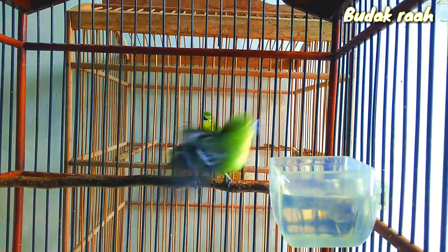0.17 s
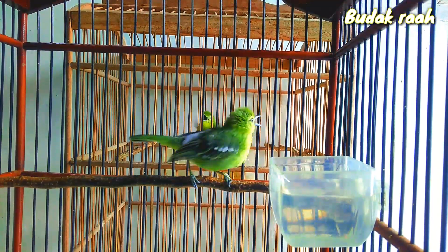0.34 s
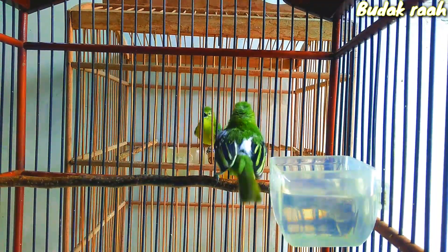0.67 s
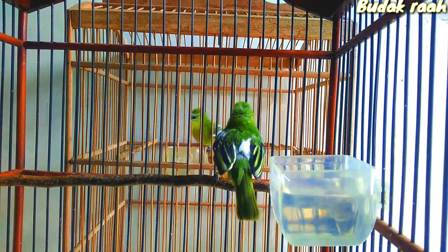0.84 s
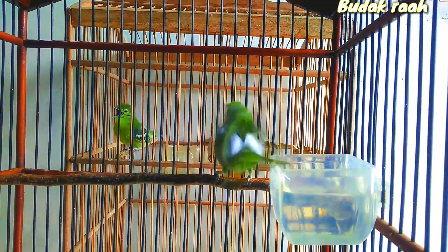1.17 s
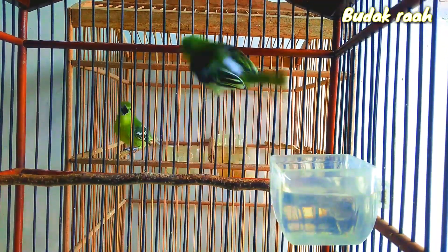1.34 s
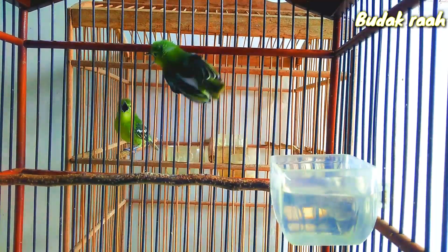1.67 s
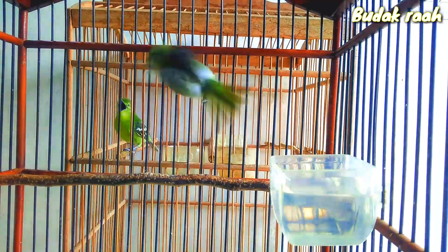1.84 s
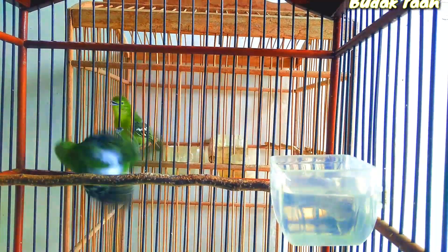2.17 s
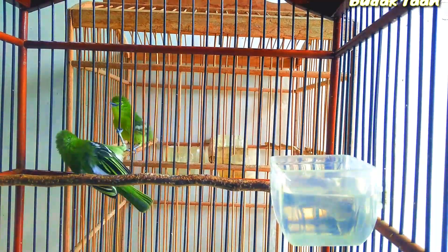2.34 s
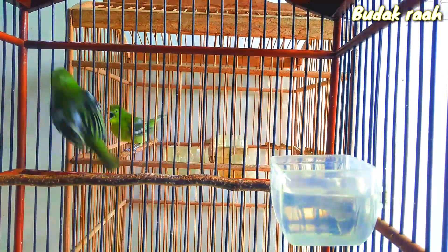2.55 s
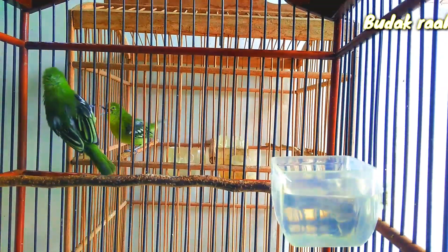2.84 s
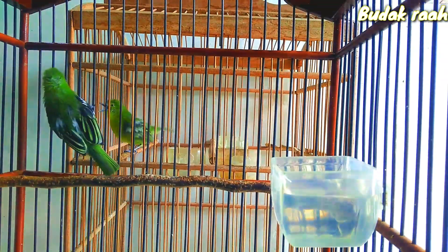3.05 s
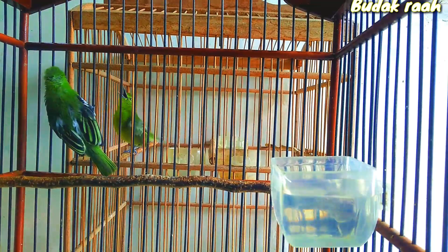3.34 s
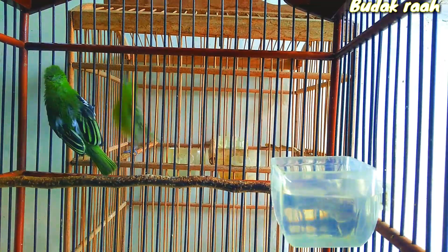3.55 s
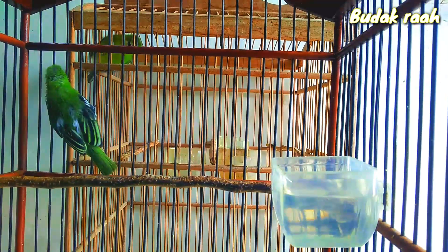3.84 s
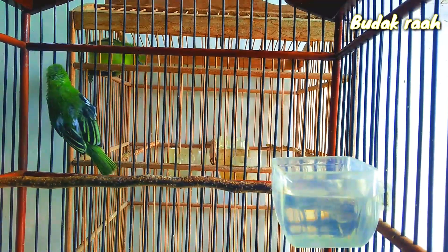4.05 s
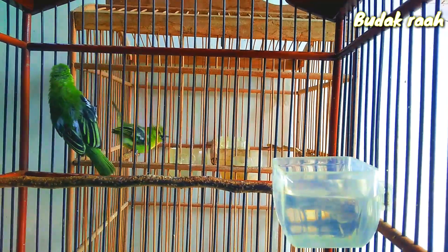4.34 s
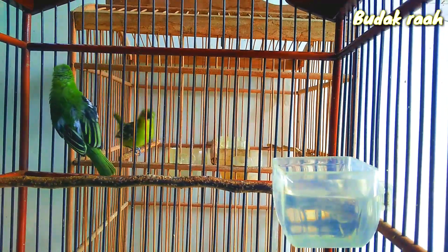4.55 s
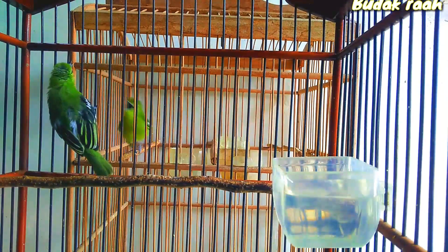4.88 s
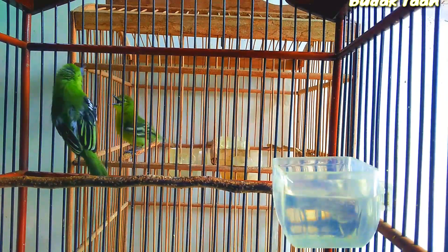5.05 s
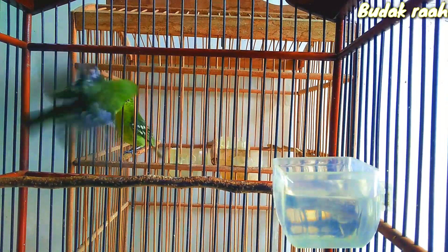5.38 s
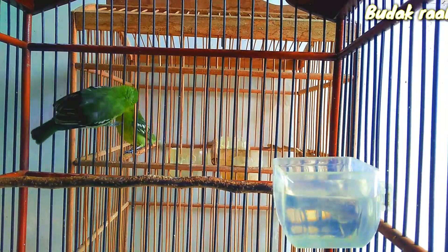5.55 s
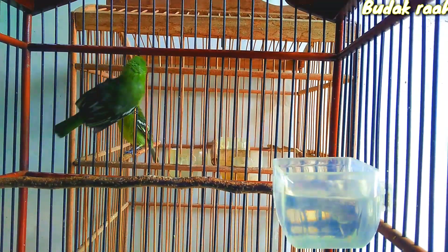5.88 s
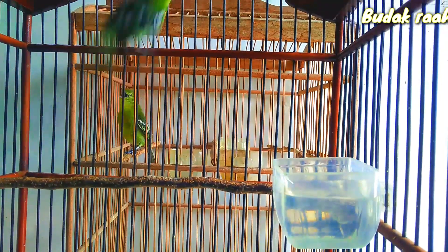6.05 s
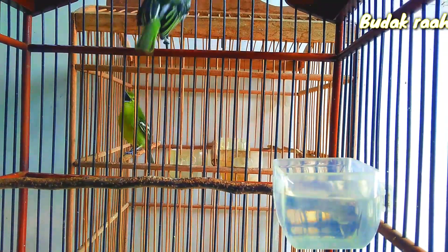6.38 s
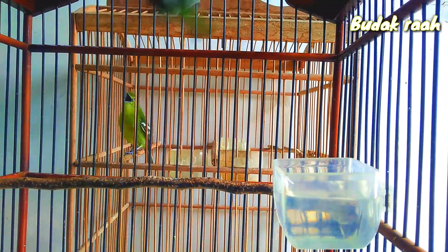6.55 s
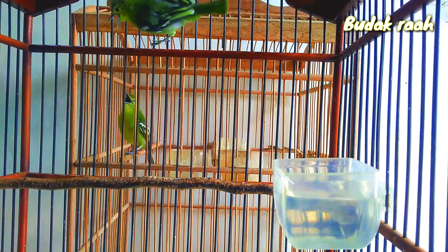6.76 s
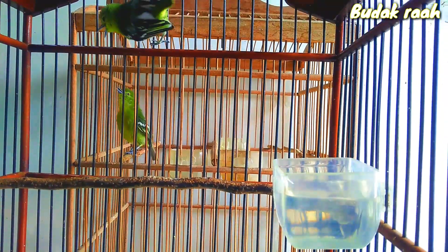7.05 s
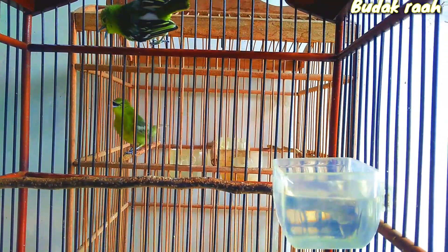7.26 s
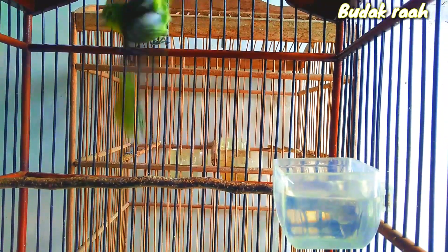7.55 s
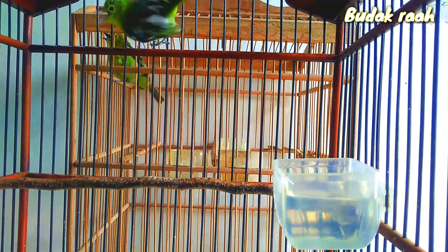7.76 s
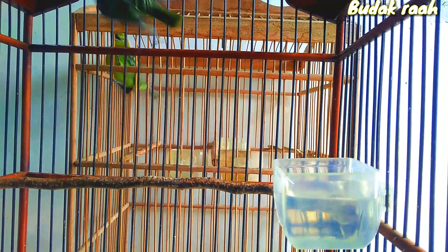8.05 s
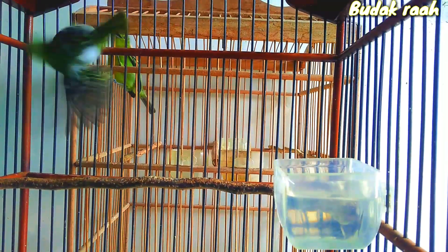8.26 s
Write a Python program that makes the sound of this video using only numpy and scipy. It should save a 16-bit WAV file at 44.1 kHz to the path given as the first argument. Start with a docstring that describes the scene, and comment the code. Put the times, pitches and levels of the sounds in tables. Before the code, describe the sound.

Two small birds call close by in wooden cages. A long harsh rasp swells and ends in a falling whistle. A fast high trill follows, mixed with short rough scolds and thin chirps, and ends in a louder falling whistle. A second long rasp and whistle come next, then a brief trill. Feet and wings knock and brush the bars. Nearby walls add a short echo, and distant motors hum faintly.

```python
"""Two small caged birds, close by: long rasps and a fast trill, each ending in a loud falling whistle.
A rasp is a harmonic tone warbled about 120 times a second; a trill is a train of gliding pips.
Short rough scolds and thin chirps fall between. Feet and wings knock and brush the wooden cages.
Nearby walls echo; distant motors hum in street noise. The loudest peaks overload the microphone."""
import sys
import numpy as np
from scipy import signal
from scipy.fft import rfft, irfft, next_fast_len
from scipy.io import wavfile
from scipy.ndimage import uniform_filter1d

SR = 44100
rng = np.random.default_rng(int(sys.argv[2]) if len(sys.argv) > 2 else 0)


def to_wav(sig):
    """Store sig (one row per channel, or 1-D mono) as 16-bit WAV at the path in sys.argv[1].

    Samples outside -1..1 are clipped; the rate is SR.
    """
    pcm = np.clip(np.atleast_2d(sig), -1, 1) * 32767
    pcm = np.round(pcm).astype(np.int16)
    wavfile.write(sys.argv[1], SR, pcm.T)  # frames by channels


N = 371322
TIME_S = np.arange(N) / SR

# per motor: (time [s], shaft rate [Hz], level [dB])
MOTOR_RUNS = [
    [(0.6, 23, -79.5), (1.3, 23, -46.5), (2.2, 17.5, -59.5), (3.1, 15, -56.5), (4.0, 29.3, -56.5),
     (5.1, 29.4, -57), (5.7, 29.3, -59), (6.6, 27, -64)],
    [(5.9, 27.5, -73), (6.8, 27.2, -61), (7.3, 26.9, -54.5), (7.95, 26.7, -49.5), (8.25, 29, -60)],
]
# per motor: (shaft order, level [dB])
MOTOR_ORDERS = [
    [(2, 4), (3, -21), (4, -1), (5, 1.5), (6, -8.5), (8, -7.5)],
    [(3, 1), (4, 5), (5, 1.5), (6, -5), (7, -3), (8, 3), (9, -1), (10, -7.5), (11, -9.5)],
]
# motor bass cut: (frequency [Hz], gain [dB])
EXHAUST_EQ = [(35, -28.5), (57, 2.5)]
# street noise colour: (frequency [Hz], gain [dB])
STREET_EQ = [(25, -26), (60, -0.5), (100, -3.5), (170, -11), (330, -9.5), (650, -16), (1300, -20.5),
             (4300, -31), (9900, -24), (15000, -45.5)]
# street noise: (time [s], level [dB])
STREET_LEVEL = [(0, -68), (2.8, -68.5), (3.5, -60), (5, -52.5), (5.5, -59), (6.5, -53), (7.9, -48),
                (8.42, -55.5)]
# hollow swells: (time [s], half length [s], centre [Hz], level [dB])
HOLLOW_SWELLS = [(1.12, 0.056, 480, -64.5), (2.188, 0.042, 506.6, -55.5), (2.68, 0.05, 487, -61),
                 (3.13, 0.033, 644, -59), (3.48, 0.081, 1025, -58), (3.679, 0.048, 363, -56.5),
                 (4.15, 0.093, 771, -67), (7.295, 1, 635, -60.5), (7.813, 0.24, 221, -52),
                 (7.88, 0.11, 1070, -64.5), (7.854, 0.07, 1803, -59)]
# air on the microphone: (time [s], half length [s], level [dB])
AIR_PUFFS = [(0.836, 0.043, -45), (1.314, 0.069, -37), (1.721, 0.15, -42.5), (2.381, 0.088, -49.5),
             (4.91, 0.075, -51.5), (6.825, 0.12, -41)]
# cage and wall echoes: (left delay [s], right delay [s], gain [dB])
ECHOES = [(.0023, 0.0063, -26.5), (.0068, .0054, -10.5), (0.0128, .0102, -8.5), (.019, 0.025, -16.5),
          (.036, .033, -16.5), (0.051, 0.057, -22.5)]
# diffuse tail: (frequency [Hz], T60 [s])
ROOM_T60 = [(200, 0.079), (1600, 0.28), (2400, 0.29), (4000, 0.18), (8000, 0.4), (14000, 0.11)]
# wing swishes: (time [s], half length [s], level [dB])
SWISHES = [(2.666, 0.054, -50), (4.343, 0.042, -46.5), (5.363, 0.048, -58), (5.798, 0.04, -48),
           (5.89, 0.024, -41), (6.222, 0.036, -39.5), (6.769, 0.017, -28)]
# hits on bars and perch: (time [s], tick [dB], thud [dB], tick decay [s])
KNOCKS = [(0.063, -45.5, -63, 0.0034), (0.542, -49, -59, 0.005), (2.202, -20, -34.5, 0.0021),
          (2.206, -44, -52.5, 0.035), (2.536, -46, -83, 0.0046), (2.563, -49, -84, 0.0026),
          (2.642, -37, -59.5, 0.007), (4.446, -43.5, -56.5, 0.012), (5.362, -54, -79, 0.003),
          (5.412, -49, -65, 0.011), (6.143, -38.5, -56, 0.015), (6.54, -30.5, -65, 0.027),
          (6.624, -29, -44, 0.011)]
# claw or feather on a bar: (frequency [Hz], gain [dB])
BAR_EQ = [(500, -40), (2000, -4), (4500, -9.5), (6500, -2.5), (11000, 12.5), (15000, -18)]
# wooden frame: (frequency [Hz], gain [dB])
WOOD_EQ = [(100, -9), (250, -10), (500, 1.5), (900, -2.5), (1600, -22), (4000, -36)]
# farther bird: (start [s], length [s], first pitch [Hz], last pitch [Hz], level [dB], jitter [ratio])
CHIRPS = [(3.265, 0.026, 4440, 6920, -34, 0.042), (4.048, 0.047, 5165, 5074, -28, 0.021),
          (4.699, 0.068, 5090, 4560, -35, 0.04), (7.675, 0.14, 5270, 5670, -45.5, 0.12)]
# scolds: (peak time [s], length [s], level [dB], peak pitch [Hz], hiss re voice [dB])
SCOLDS = [(0.659, 0.062, -22.5, 1347, -26.5), (0.81, 0.059, -20, 1222, -31), (2.909, 0.02, -33, 1407, -23),
          (2.946, 0.047, -22, 1345, -17.5), (3.082, 0.044, -22.5, 1271, -28),
          (4.748, 0.034, -20, 1401, -18.5), (4.832, 0.04, -22, 1367, -13), (4.916, 0.042, -21, 1326, -15),
          (4.995, 0.053, -24.5, 1392, -13), (5.621, 0.059, -27, 1343, -13.5),
          (8.291, 0.053, -23.5, 1542, -8)]
# per trill: (time [s], pitch [Hz], level [dB], left-right [dB], wall send [dB])
TRILLS = [
    [(2.971, 3195, -28, 17, -1), (3.08, 3211, -20, 36, 3), (3.42, 3145, -14, 19.5, 3),
     (3.65, 3084, -13.5, -3.5, -2.5), (3.83, 3034, -18, -7, 8.5), (4.25, 2985, -19.5, 4.5, 2),
     (4.965, 2914, -18.5, 2, -8.5)],
    [(8.237, 3074, -27, 5, 1), (8.335, 3218, -7.5, 20, -3.5), (8.41, 3214, -19.5, 24, 7)],
]
# stressed pips: (time [s], boost [dB])
STRESSES = [(4.274, 4), (4.442, 7), (4.776, 8), (4.834, 7)]
# pip overtones: (harmonic, level [dB])
PIP_PARTIALS = [(2, -39), (3, -31.5), (4, -47), (5, -42)]
# whistles: (start [s], length [s], attack [s], first pitch [Hz], last pitch [Hz],
# bend [0 even slide, 1 hold then drop], peak [dB], croak [dB])
WHISTLES = [(2.26, 0.2, 0.081, 2294, 1683, 0.34, -9.5, -46), (4.99, 0.17, 0.021, 2477, 1471, 0.6, 0, -33.5),
            (7.079, 0.2, 0.081, 2294, 1729, 0.29, -10.5, -46.5)]
# whistle overtones: (harmonic, level [dB])
WHISTLE_PARTIALS = [(2, -1.5), (3, -2.5), (4, 2.5), (5, -2), (6, 0.5), (7, -16)]
# colour the whistle overtones slide through: (frequency [Hz], gain [dB])
WHISTLE_EQ = [(3300, -47), (4400, -48), (6000, -54), (8600, -39), (10200, -43), (12200, -26), (13400, -31),
              (15000, -44)]
# rasps: (start [s], hold [s], slack ending [s], first level [dB], top level [dB],
# mid pitch [Hz], warble depth [ratio])
RASPS = [(0.835, 1.063, 0.24, -24, -16, 1246, 0.11), (5.738, 1.178, 0.022, -28.5, -14, 1234, 0.088)]
# rasping voice: (harmonic, firm level [dB], slack level [dB])
RASP_PARTIALS = [(1, -29.5, -27), (2, -20, -20), (3, 5, -1.5), (4, -15, 5), (5, -27.5, -15)]
# rasping voice colour: (frequency [Hz], gain [dB])
BEAK_EQ = [(1000, -9), (1260, 3), (1450, -6), (1750, -1), (2050, 6), (2450, -1.5), (2850, -6), (3300, -2.5),
           (3750, -3.5), (4250, -2), (4600, -2), (4950, -7), (5500, -9.5), (6500, -12)]
# hiss in the calls: (frequency [Hz], gain [dB])
HISS_EQ = [(4500, -41.5), (5800, -6.5), (7200, -14.5), (8700, -6.5), (10900, 1.5), (13400, -6.5),
           (15200, -19)]
# hiss in the rasps: (time [s], level [dB])
RASP_HISS_LEVEL = [(0.84, -58), (1.03, -55), (1.11, -44.5), (1.28, -42.5), (1.42, -37.5), (1.75, -34.5),
                   (2.12, -30.5), (5.74, -61.5), (6.08, -52), (6.2, -44.5), (6.48, -40), (6.6, -32.5),
                   (6.76, -30), (6.94, -28.5)]
# microphone ports, right one brighter: (frequency [Hz], left-right [dB])
PORT_BALANCE = [(4500, 3), (7000, 3.5), (11000, -4)]


def amp(db):
    """Decibels to gain."""
    return 10 ** (np.asarray(db) / 20)


def unit(x):
    """Scale to rms 1."""
    return x / np.sqrt(np.mean(x ** 2) + 1e-20)


def bell(t, half_s):
    """Gaussian envelope, 1/e at +-half_s."""
    return np.exp(-(t / half_s) ** 2)


def follow(rows, t):
    """Each column of a time curve at t."""
    times, *columns = np.transpose(rows)
    return [np.interp(t, times, column) for column in columns]


def spectrum_at(points, hz):
    """Interpolate over log frequency."""
    knots_hz, values = np.transpose(points)
    return np.interp(np.log(hz + 1), np.log(knots_hz), values)


def colour(x, eq):
    """Filter by a dB curve."""
    size = next_fast_len(x.shape[-1] + 2048)
    gain = amp(spectrum_at(eq, np.fft.rfftfreq(size, 1 / SR)))
    return irfft(rfft(x, size) * gain, size)[..., :x.shape[-1]]


def drift(size, rate_hz):
    """Smooth random wander, rms about 1."""
    knots = rng.standard_normal(int(size / SR * rate_hz) + 3)
    return np.interp(np.arange(size) / SR * rate_hz, np.arange(len(knots)), knots)


def resonate(x, hz, width_hz):
    """Double-pole resonance, unity gain."""
    carrier = np.exp(2j * np.pi * np.cumsum(np.full(len(x), hz)) / SR)
    r = np.exp(-np.pi * width_hz / SR)
    return 2 * (carrier * signal.lfilter([(1 - r) ** 2], [1, -2 * r, r * r], x / carrier)).real


def band(x, hz, width_hz):
    """Flat-topped band-pass."""
    carrier = np.exp(2j * np.pi * np.cumsum(np.full(len(x), hz)) / SR)
    lowpass = signal.butter(2, width_hz / 2, fs=SR, output="sos")
    return 2 * (carrier * signal.sosfilt(lowpass, x / carrier)).real


def tone(hz, partials=((1, 0),)):
    """Harmonics of a pitch curve; default is a sine."""
    phase = 2 * np.pi * np.cumsum(hz) / SR
    return sum(amp(db) * np.sin(round(k) * phase) for k, db in partials)


def patchy(x, depth_db=3.2):
    """Swell and sink in random time-frequency patches."""
    bins = signal.stft(x, nperseg=2048)[2]
    patches = uniform_filter1d(rng.standard_normal(bins.shape[1:]), size=6, axis=0)
    patches = unit(uniform_filter1d(patches, size=7, axis=1))
    return signal.istft(bins * amp(depth_db * patches), nperseg=2048)[1][:, :N]


def add(mix, start_s, sound, pan_db, send_db):
    """Add to left, right and wall send; pan_db is left minus right."""
    part = mix[:, max(round(start_s * SR), 0):][:, :len(sound)]
    sides = amp([pan_db / 2, -pan_db / 2])
    part += np.append(sides / sides.mean(), amp(send_db))[:, None] * sound[:part.shape[1]]


def motor(run, orders):
    """Distant engine: low, slightly wavering shaft orders."""
    shaft_hz, db = follow(run, TIME_S)
    hum = unit(tone(shaft_hz * (1 + 0.0011 * drift(N, 21)), orders))
    return colour(hum, EXHAUST_EQ) * amp(db + drift(N, 5.6))


def outdoors(coherence=0.16, hollow_width_ratio=0.17, pan_db=3.0):
    """Motors, uneven street noise with hollow swells, low puffs of air."""
    motors = sum(motor(run, orders) for run, orders in zip(MOTOR_RUNS, MOTOR_ORDERS))
    common = np.sqrt(coherence) * rng.standard_normal(N)
    noise = common + np.sqrt(1 - coherence) * rng.standard_normal((2, N))
    street = unit(colour(patchy(noise), STREET_EQ))
    street *= amp(follow(STREET_LEVEL, TIME_S)[0] + drift(N, 14))
    puffs = sum(amp(db) * bell(TIME_S - at_s, half_s) for at_s, half_s, db in AIR_PUFFS)
    air = puffs * unit(resonate(rng.standard_normal(N), hz=90, width_hz=33))
    hollow = sum(amp(db) * bell(TIME_S - at_s, half_s)
                 * unit(resonate(noise[0], hz, hollow_width_ratio * hz))
                 for at_s, half_s, hz, db in HOLLOW_SWELLS)
    return (motors + street + air + hollow) * amp([[pan_db / 2], [-pan_db / 2]])


def walls(send, tail_db=-12, pan_db=3.5, build_s=0.02):
    """Distinct echoes plus a short diffuse tail."""
    hz, t, bins = signal.stft(rng.standard_normal((2, SR // 2)), SR, nperseg=256)
    bins = bins * amp(-60 * t / spectrum_at(ROOM_T60, hz)[:, None]) * (1 - np.exp(-t / build_s))
    response = signal.istft(bins, SR, nperseg=256)[1]
    response *= amp(tail_db) / np.linalg.norm(response[0])
    for left_s, right_s, db in ECHOES:
        response[[0, 1], [round(left_s * SR), round(right_s * SR)]] += amp(db)
    return signal.fftconvolve(send[None], response, axes=1)[:, :N] * amp([[pan_db / 2], [-pan_db / 2]])


def wings(grain_db=5):
    """Feathers brush the bars in grainy swishes."""
    mix = np.zeros((3, N))
    envelope = sum(amp(db) * bell(TIME_S - at_s, half_s) for at_s, half_s, db in SWISHES)
    grains = rng.standard_normal(N) * amp(grain_db * drift(N, 340))
    add(mix, 0, envelope * unit(colour(grains, BAR_EQ)), pan_db=4, send_db=8)
    return mix


def cage_knocks():
    """Claws tick and scrape on the bars; the wooden frame thuds."""
    mix = np.zeros((3, N))
    t = np.arange(0, .2, 1 / SR)
    for start_s, tick_db, thud_db, decay_s in KNOCKS:
        claw, frame = rng.standard_normal((2, len(t)))
        scrape = unit(colour(claw * amp(1.7 * drift(len(t), 590)), BAR_EQ))
        tick = 4.2 * scrape * np.exp(-t / decay_s) * (1 - np.exp(-2 * t / decay_s))
        thud = unit(colour(frame, WOOD_EQ)) * np.exp(-t / (decay_s + 0.015))
        add(mix, start_s, amp(tick_db) * tick + amp(thud_db) * thud, pan_db=13, send_db=-2)
    return mix


def chirps():
    """Thin hoarse notes with a strong octave, mostly heard off the walls."""
    mix = np.zeros((3, N))
    for start_s, length_s, first_hz, last_hz, db, jitter in CHIRPS:
        size = int(length_s * SR)
        hz = np.linspace(first_hz, last_hz, size) * (1 + jitter * drift(size, 1376))
        note = tone(hz, [(1, -5.5), (2, -7), (3, -20)]) * signal.windows.tukey(size, .6)
        add(mix, start_s, amp(db) * note, pan_db=33, send_db=13.5)
    return mix


def warble(t, pitch_hz, rate_hz, depth, jitter, slack, throb_db=2, shimmer_db=3.45):
    """Rasping voice and its hiss: fast pitch modulation, loudest at each crest."""
    cycles = np.cumsum(rate_hz * (1 + 0.009 * drift(len(t), 120))) / SR
    crest = np.cos(2 * np.pi * cycles)
    swing = depth * crest * (1 + 0.21 * drift(len(t), 240))
    hz = pitch_hz * (1 + swing + jitter * drift(len(t), 1600))
    throb = amp(throb_db * crest + shimmer_db * drift(len(t), 120))
    partials = [(k, firm_db + (slack_db - firm_db) * slack) for k, firm_db, slack_db in RASP_PARTIALS]
    voice = colour(throb * tone(hz, partials), BEAK_EQ)
    hiss = colour(throb * rng.standard_normal(len(t)), HISS_EQ)
    return unit(voice), unit(hiss)


def scolds(attack_share=0.4, pitch_arch=0.15):
    """Short bursts of the rasping voice; pitch and level arch together."""
    mix = np.zeros((3, N))
    for peak_s, length_s, db, peak_hz, hiss_db in SCOLDS:
        t = np.arange(0, length_s, 1 / SR)
        rise_s = attack_share * length_s
        swell = np.sin(np.interp(t, [0, rise_s, length_s], [0, np.pi / 2, np.pi])) ** 2
        hz = peak_hz * (1 - pitch_arch * (1 - swell))
        voice, hiss = warble(t, hz, rate_hz=131, depth=0.094, jitter=0.115, slack=0)
        burst = amp(db) * swell * (voice + amp(hiss_db) * hiss)
        add(mix, peak_s - rise_s, burst, pan_db=8.5, send_db=4.5)
    return mix


def pip_times(trill, quick_gap_s, tired_gap_s, tires_after_s=0.911, tiring_s=0.14):
    """(time [s], tiredness [0-1]) per pip; a tired bird slows."""
    start_s, end_s = trill[0][0], trill[-1][0]
    age_s = np.arange(0, end_s - start_s, quick_gap_s)
    age_s += np.maximum(age_s - tires_after_s, 0) * (tired_gap_s / quick_gap_s - 1)
    age_s = age_s[age_s < end_s - start_s]
    tired = 1 / (1 + np.exp((tires_after_s - age_s) / tiring_s))
    return zip(start_s + age_s, tired)


def pip(t, hz, db, tired, quick_half_s=0.0055, tired_half_s=0.017, dulling_db=-9):
    """Upward glide through the throat resonance; longer and duller when tired."""
    u = t / (quick_half_s + (tired_half_s - quick_half_s) * tired)
    glide = 0.012 * (1 - np.exp(-np.maximum(u, -1.6)))
    pitch_hz = hz * (1 + glide + 0.011 * drift(len(t), 503.5))
    fundamental = amp(db) * tone(pitch_hz) / np.cosh(2.1 * u)
    # overtones miss the resonance and peak earlier
    overtone_db = -12 + dulling_db * tired + 2 * rng.standard_normal()
    overtones = amp(overtone_db) * tone(pitch_hz, PIP_PARTIALS) * bell(t + 0.0083, half_s=0.0072)
    return (fundamental + overtones) * signal.windows.tukey(len(t), .3)


def trills(quick_gap_s=0.0506, tired_gap_s=0.056, scatter_db=0.3, left_lag_samples=5,
           catch_db=-45, catch_hz=3850, catch_hz_per_s=110000, lead_s=0.017, lag_s=0.0035):
    """Pip trains; a quick rising catch leads each pip, a second sounds at the peak of tired pips."""
    mix = np.zeros((3, N))
    t = np.arange(-.03, .03, 1 / SR)
    for trill in TRILLS:
        for at_s, tired in pip_times(trill, quick_gap_s, tired_gap_s):
            hz, db, pan_db, send_db = follow(trill, at_s)
            db += scatter_db * tired * rng.standard_normal()
            db += sum(boost for stress_s, boost in STRESSES if abs(stress_s - at_s) < tired_gap_s / 2)
            start_s = at_s + t[0]
            add(mix, start_s, pip(t, hz, db, tired), pan_db, send_db)
            sweep_hz = catch_hz + catch_hz_per_s * t + 300 * drift(len(t), 1400)
            catch = amp(catch_db + 2 * rng.standard_normal()) * tone(sweep_hz) * bell(t, half_s=0.0034)
            add(mix, start_s - lead_s, catch, pan_db, send_db)
            add(mix, start_s + lag_s, tired * amp(-3) * catch, pan_db, send_db)
    mix[0] = np.roll(mix[0], left_lag_samples)  # arrives from another direction
    return mix


def croak(hz, width_hz=950, half_s=0.037):
    """Break in the voice: narrow-band noise, peak at 0.08 s."""
    t = np.arange(-.08, .08, 1 / SR)
    noise = band(rng.standard_normal(len(t)), hz, width_hz)
    return unit(band(noise, hz, width_hz)) * bell(t, half_s)


def whistles(pure_share=0.54, hold_s=0.014, fade_db_per_s=134, release_s=0.0083,
             lead_db=-27, hiss_db=-41, flicker_db=3, croak_lag_s=0.02):
    """Pure notes swell, slide down, fray and break into a croak."""
    mix = np.zeros((3, N))
    for start_s, length_s, attack_s, first_hz, last_hz, bend, db, croak_db in WHISTLES:
        t = np.arange(0, length_s, 1 / SR)
        u = t / length_s
        late_drop = np.sin(np.pi / 2 * u ** 1.8) ** 2
        fray = np.clip((u - pure_share) / (1 - pure_share) * 2, 0, 1)
        hz = first_hz + (last_hz - first_hz) * ((1 - bend) * u + bend * late_drop)
        hz *= 1 + 0.003 * drift(len(t), 200) + 0.021 * fray * drift(len(t), 1100)
        swell = np.minimum(t / attack_s, 1) ** 3.74
        swell *= amp(-fade_db_per_s * np.maximum(t - attack_s - hold_s, 0))
        lead = amp(lead_db) * bell(t - 0.018, half_s=0.011)  # soft touch before the swell
        overtones = colour(tone(hz, WHISTLE_PARTIALS), WHISTLE_EQ) * swell ** 0.33
        overtones *= amp(-10 * fray + flicker_db * drift(len(t), 150))
        hiss = amp(hiss_db) * fray * unit(colour(rng.standard_normal(len(t)), HISS_EQ))
        note = (amp(db) * swell + lead) * tone(hz) + amp(db) * (overtones + hiss)
        release = np.minimum((length_s - t) / release_s, 1)
        add(mix, start_s, release * note, pan_db=4.5, send_db=-2)
        croak_peak_s = start_s + length_s + croak_lag_s
        add(mix, croak_peak_s - .08, amp(croak_db) * croak(1.28 * last_hz), pan_db=10.5, send_db=-5.5)
    return mix


def rasps(gain_db=1.5, edge_s=0.0073, settle_s=0.11, scoop_hz=40.9, climb_hz=66.7,
          slacken_s=0.021, slack_db=-12, slack_drop_hz=107.7,
          buzz_hz=125, fastest_at_s=0.57, sag_hz_per_s2=16):
    """Long warble settles, swells, climbs; gone slack, it sinks and favours partial 4. Hiss stays."""
    mix = np.zeros((3, N))
    for start_s, hold_s, ending_s, first_db, top_db, mid_hz, depth in RASPS:
        t = np.arange(0, hold_s + ending_s, 1 / SR)
        u = np.minimum(t / hold_s, 1)
        slack = np.clip((t - hold_s) / slacken_s + .5, 0, 1)
        unsettled = bell(t, settle_s)
        effort_db = gain_db + top_db + (first_db - top_db) * (1 - u) ** 1.74 + slack_db * slack
        rate_hz = buzz_hz - sag_hz_per_s2 * (t - fastest_at_s) ** 2
        pitch_hz = mid_hz + climb_hz * (u ** 2 - .5) - scoop_hz * unsettled - slack_drop_hz * slack
        jitter = 0.018 + 0.055 * (unsettled + 0.45 * slack)
        strain = 0.44 * u ** 4  # climax tips toward the slack colour
        voice, hiss = warble(t, pitch_hz, rate_hz, depth, jitter, np.maximum(slack, strain))
        fade = np.clip(np.minimum(t, t[-1] - t) / edge_s, 0, 1)
        hiss_db = follow(RASP_HISS_LEVEL, start_s + t)[0]
        add(mix, start_s, fade * amp(effort_db) * voice, pan_db=5, send_db=5)
        add(mix, start_s, fade * amp(hiss_db) * hiss, pan_db=0.5, send_db=7)
    return mix


def scene():
    """Birds and cages, direct and off the walls, over the outdoor background."""
    near = rasps() + scolds() + whistles() + trills() + chirps() + cage_knocks() + wings()
    return near[:2] + walls(near[2]) + outdoors()


def record(dry, left_lag_samples=7, cutoff_hz=15400):
    """Two spaced ports of unlike colour, soft clip, low-pass."""
    left = colour(dry[0], [(hz, db / 2) for hz, db in PORT_BALANCE])
    right = colour(dry[1], [(hz, -db / 2) for hz, db in PORT_BALANCE])
    ports = np.array([np.pad(left, (left_lag_samples, 0))[:N], right])
    clipped = ports / (1 + ports ** 12) ** (1 / 12)
    lowpass = signal.firwin(301, cutoff_hz, window=("kaiser", 8), fs=SR)
    return signal.oaconvolve(clipped, lowpass[None], "same")


dry = scene()
out = record(dry)
to_wav(out)
```